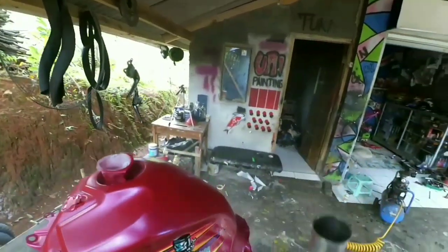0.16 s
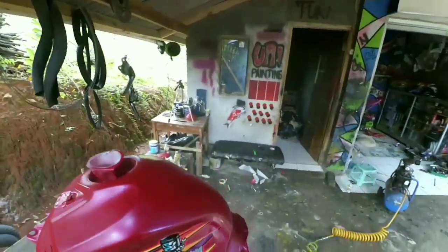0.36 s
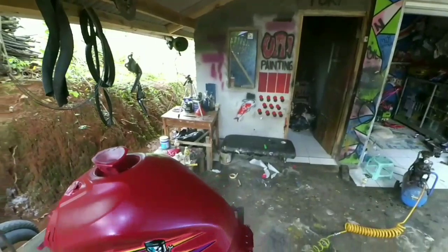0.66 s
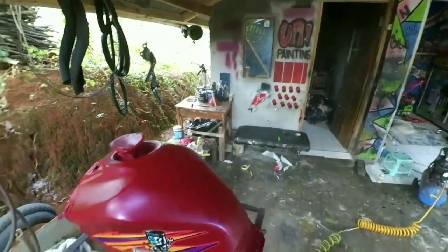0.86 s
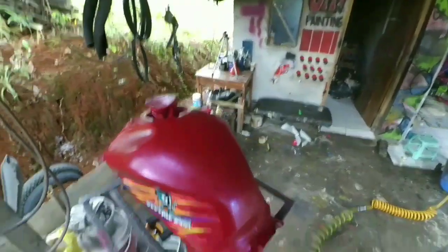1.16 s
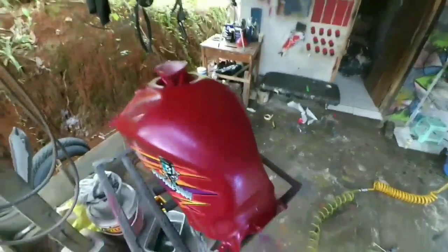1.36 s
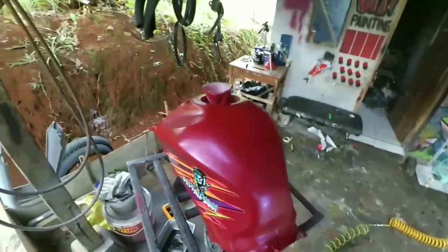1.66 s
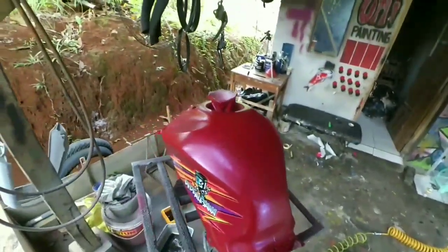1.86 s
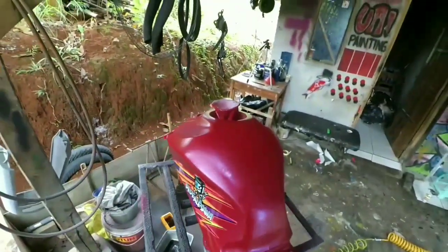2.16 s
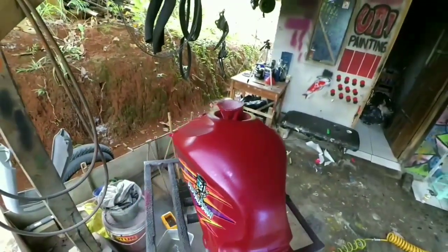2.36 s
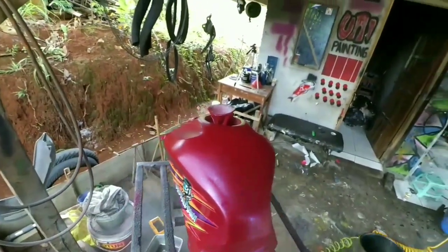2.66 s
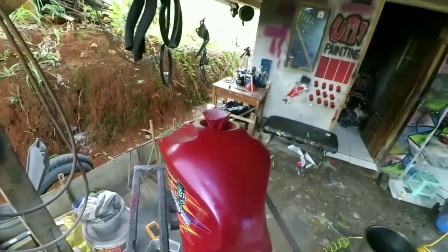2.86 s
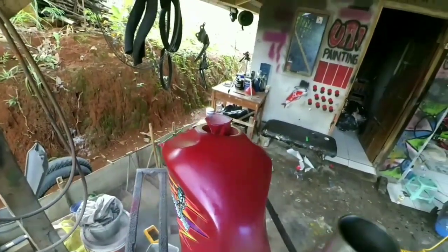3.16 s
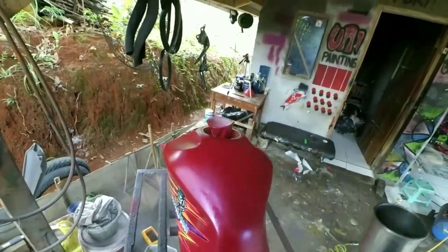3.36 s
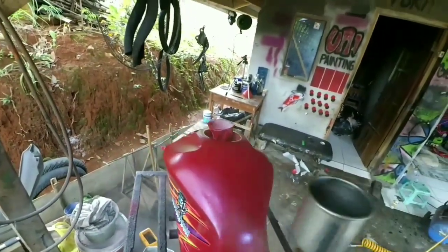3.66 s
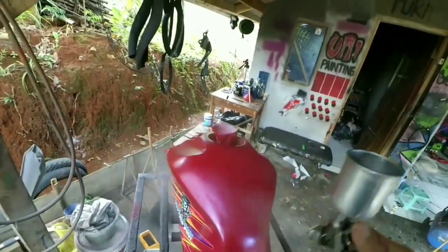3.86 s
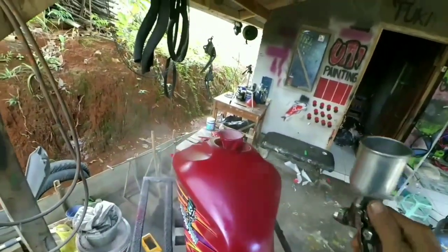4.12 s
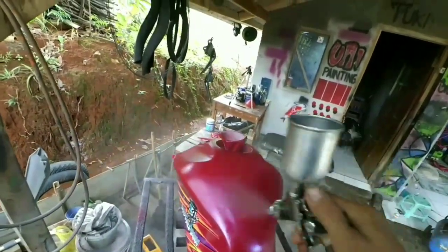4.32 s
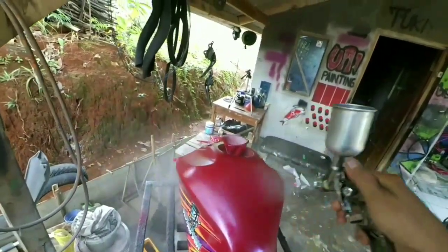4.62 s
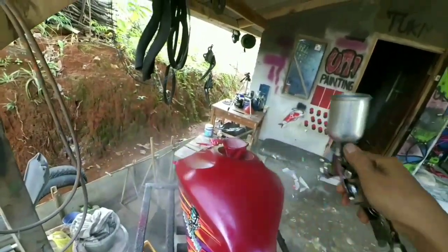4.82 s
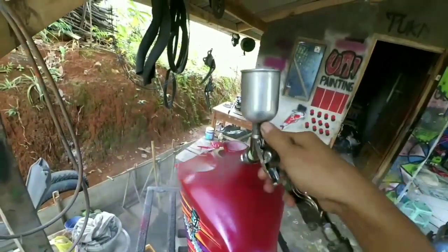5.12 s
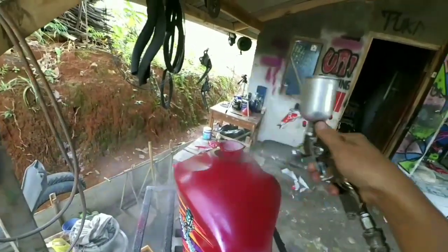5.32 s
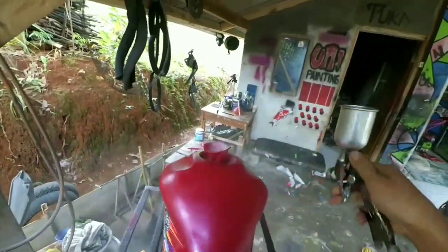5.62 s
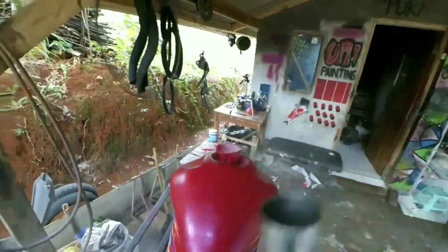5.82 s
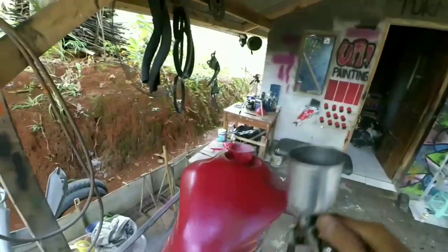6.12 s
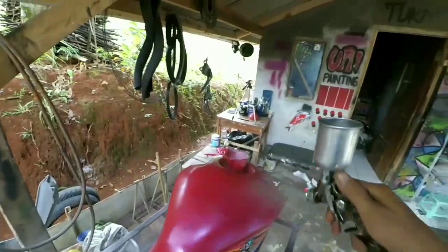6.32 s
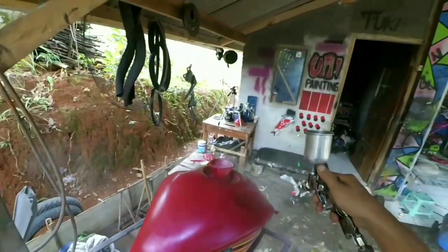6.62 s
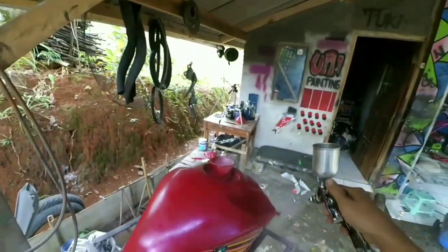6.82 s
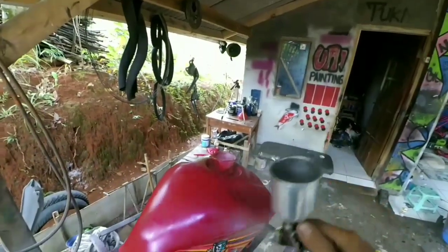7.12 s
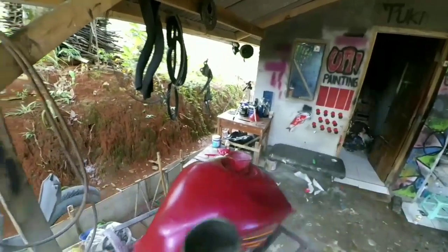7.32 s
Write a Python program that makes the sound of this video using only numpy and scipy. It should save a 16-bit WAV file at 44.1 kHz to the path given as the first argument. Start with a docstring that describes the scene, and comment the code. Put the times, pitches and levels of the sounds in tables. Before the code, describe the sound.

An open-sided workshop, heard close and in mono, with a low soft outdoor rumble and only a short faint reflection. A spray puff already under way ends at about 0.1 s; a very brief one follows at 0.2 s. Only quiet rumble remains until 2.05 s, when a short bright burst sounds, followed at 2.3 s by a long hissing pass. It starts with a sharp surge of air, then wavers gently, becoming fuller with paint mist from about 3.8 s. A soft dull bump occurs near 3.1 s. At 5.1 s a switch clacks with a metallic ring; a compressor motor whines upward and buzzes roughly until about 5.6 s, when the spray also stops. The piston settles into a steady droning chug with airy puffs and faint hiss. From 5.9 s a second long spray runs over it to the end, around 7.5 s.

```python
"""A spray gun mists paint on a motorcycle tank in an open-sided workshop, over a low outdoor rumble.
It gives three short test puffs of coloured noise, the first already under way, then a long first pass.
During that pass something bumps softly, then a compressor's switch clacks; its motor whines and buzzes
as it runs up, and its piston drones on as a sum of crank-rate multiples, with puffs and hiss of air.
A second long pass follows over the drone; the sound is mono."""
import sys
import numpy as np
from scipy import signal
from scipy.fft import rfft, irfft, next_fast_len
from scipy.io import wavfile
from scipy.ndimage import map_coordinates

SR = 44100
rng = np.random.default_rng(int(sys.argv[2]) if len(sys.argv) > 2 else 0)


def materialize(psi):
    """Save the field psi as 16-bit PCM at rate SR to the path in sys.argv[1].

    A 1-D psi becomes a single channel; in a 2-D psi each row is a channel.
    """
    bounded = np.clip(np.atleast_2d(psi).T, -1, 1)
    quanta = np.round(bounded * 32767).astype(np.int16)
    wavfile.write(sys.argv[1], SR, quanta)


N = 329868


def amp(db):
    """Decibels to gain."""
    return 10 ** (np.asarray(db) / 20)


def unit(x):
    """Scale to rms 1."""
    return x / np.sqrt(np.mean(x ** 2) + 1e-20)


def clock():
    """Time of each sample in seconds."""
    return np.arange(N) / SR


def wobble(rate):
    """A smooth random curve through `rate` random knots a second."""
    coarse = clock()[::64]
    knots = rng.standard_normal(int(N * rate / SR) + 4)
    return np.interp(clock(), coarse, map_coordinates(knots, [coarse * rate]))


def filtered(x, response):
    """x times a complex response of frequency, padded so that tails do not wrap round."""
    m = 2 * next_fast_len(N // 2 + SR // 4)
    return irfft(rfft(x, m) * response(np.fft.rfftfreq(m, 1 / SR)), m)[:N]


def colour(points):
    """Causal response through (Hz, dB) points on a log frequency axis."""
    f, db = np.transpose(points)

    def response(hz):
        log_gain = np.log(amp(np.interp(np.log(hz + 1), np.log(f + 1), db)))
        # folding the cepstrum forward in time gives minimum phase
        cepstrum = irfft(log_gain)
        cepstrum[1:len(hz) - 1] *= 2
        cepstrum[len(hz):] = 0
        return np.exp(rfft(cepstrum))
    return response


def resonances(modes):
    """Causal response of (Hz, width in Hz, dB) modes, added with alternating sign."""
    def response(f):
        total = 0
        for k, (centre, width, db) in enumerate(modes):
            damping = 1j * f * width
            total = total + (-1) ** k * amp(db) * damping / (centre * centre - f * f + damping)
        return total
    return response


def noise(response, gate=1):
    """Gated white noise through a response, rms 1."""
    return unit(filtered(gate * rng.standard_normal(N), response))


def decay(start, t60):
    """An envelope that jumps to 1 and falls 60 dB in t60 seconds."""
    age = clock() - start
    return (age >= 0) * amp(-60 * np.maximum(age, 0) / t60)


def fall(stop, t60):
    """An envelope that holds at 1 until stop, then falls 60 dB in t60 seconds."""
    return amp(-60 * np.maximum(clock() - stop, 0) / t60)


# Colour of the outdoor rumble. Each row: frequency in Hz, density in dB per Hz.
OUTDOOR_COLOUR = [(11, -6.5), (18, -3), (34, -1.5), (66, -10), (97, -12), (125, -22), (227, -26.5),
                  (309, -35), (346, -28), (471, -34), (781, -43), (1010, -67), (1100, -46.5), (1260, -44),
                  (15000, -71)]
# Distant drone and faint shrilling. Each row: centre in Hz, width in Hz, level in dB.
YARD_MODES = [(24.2, 3.2, 15.5), (108.4, 51, 1), (258.5, 78, -6), (522, 30, -12.5), (803, 131, -16),
              (4630, 560, -47), (7300, 260, -43.5)]


def background(rumble_db=-45, hum_db=-49):
    """Outdoor rumble, its level wavering slightly, with a faint far hum from resonated noise."""
    rumble = amp(rumble_db + 0.19 * wobble(4.02)) * noise(colour(OUTDOOR_COLOUR))
    return rumble + amp(hum_db) * noise(resonances(YARD_MODES))


# Trigger pulls. Each row: open in seconds, close in seconds, level in dB, air surge in dB.
TRIGGER_PULLS = [(-.1, 0.089, -4.5, 4), (0.197, 0.27, -2.5, -9), (2.062, 2.156, 1.5, 4.5),
                 (2.275, 5.583, 1.5, 4), (5.901, 7.601, 1, 3)]
# Colours of the air jet, the paint mist and the opening surge.
# Each row: frequency in Hz, density in dB per Hz.
JET_COLOUR = [(200, -23.5), (600, -16), (1200, -10.5), (2500, -9.5), (3700, -4.5), (5500, -4), (7200, 0),
              (8600, 0.5), (10000, -0.5), (11500, -4.5), (13500, -7), (15400, -10)]
MIST_COLOUR = [(200, -13.5), (600, -14), (1800, -12.5), (2600, -12.5), (3600, 0.5), (4600, 0), (5600, 0),
               (6600, 1.5), (8000, -4.5), (12000, -31)]
SURGE_COLOUR = [(400, -6.5), (1200, -7), (2500, -4), (4000, -3.5), (7500, -6), (10000, 5), (12000, 4.5),
                (14700, -2)]
# The hiss swells as the gun swings. Each row: time in seconds, hiss in dB.
# Only the swing relative to REFERENCE_HISS_DB is used, scaled for each layer.
FIRST_PASS_HISS = [(2.33, -42), (2.38, -42.5), (2.59, -40.5), (2.77, -43.5), (2.98, -41), (3.39, -40.5),
                   (3.42, -43.5), (3.69, -39), (4.13, -42.5), (4.21, -40), (4.65, -39.5), (4.81, -42.5),
                   (5.23, -40), (5.55, -41.5)]
SECOND_PASS_HISS = [(5.96, -41.5), (5.972, -42.5), (6.118, -38.5), (6.848, -42.5), (7.124, -40.5),
                    (7.46, -43)]
REFERENCE_HISS_DB = -39  # near the loudest swings
JET_SWING, MIST_SWING = 0.74, 1.3  # dB of each layer per dB of swing
APPROACH_S, REACHED_S = 3.7, 3.8  # the gun is brought up to the tank
OFF_TANK_DB = -4  # less mist strikes before that
PAINT_RISE_S = 0.14  # time constant of the paint following the air into each pull
# strongest band of the jet: lower when aimed squarely
FOCUS_HZ, FOCUS_HZ_PER_DB, FOCUS_OFF_TANK_HZ = 7710, -130, 348.7


def focus_band(swing_db, off_tank, width_hz=700):
    """The jet's strongest band is low-passed noise shifted up in pitch, sliding as the nozzle turns."""
    low_noise = noise(lambda hz: 1 / (1 + (hz / width_hz) ** 2) + 0j)
    focus_hz = FOCUS_HZ + FOCUS_HZ_PER_DB * swing_db + FOCUS_OFF_TANK_HZ * off_tank
    shift_turns = np.cumsum(focus_hz - width_hz / 2) / SR
    return unit(np.real(signal.hilbert(low_noise) * np.exp(2j * np.pi * shift_turns)))


def spray(closing_t60=0.15, surge_t60=0.55, jet_db=-38.5, focus_db=-51, mist_db=-44.0, surge_db=-43):
    """Air tears paint from the nozzle; hose pressure brightens each start, and aim colours the rest."""
    opening_s = .009
    t, valve, surge, paint = clock(), np.zeros(N), np.zeros(N), np.zeros(N)
    for opens, closes, db, extra_db in TRIGGER_PULLS:
        opened = np.clip((t - opens) / opening_s + .5, 0, 1) ** 2
        flow = opened * fall(closes, closing_t60)
        valve += amp(db) * flow
        surge += amp(extra_db) * flow * decay(opens, surge_t60)
        paint += amp(db) * flow * (1 - np.exp(-np.maximum(t - opens, 0) / PAINT_RISE_S))
    swing_s, hiss_db = np.transpose(np.vstack([FIRST_PASS_HISS, SECOND_PASS_HISS]))
    swing_db = np.interp(t, swing_s, hiss_db) - REFERENCE_HISS_DB
    off_tank = np.clip((REACHED_S - t) / (REACHED_S - APPROACH_S), 0, 1)

    jet = amp(jet_db) * noise(colour(JET_COLOUR)) + amp(focus_db) * focus_band(swing_db, off_tank)
    jet = amp(JET_SWING * swing_db) * jet
    mist_level = amp(mist_db + MIST_SWING * swing_db + OFF_TANK_DB * off_tank)
    mist = mist_level * noise(colour(MIST_COLOUR))
    return valve * jet + paint * mist + amp(surge_db) * surge * noise(colour(SURGE_COLOUR))


# Soft handling bump. Each row: time in seconds, level in dB.
SOFT_BUMPS = [(3.075, -50)]


def bump(t60=0.25):
    """Something bumps softly nearby: a dull burst of noise dies away."""
    dull = noise(colour([(80, -15), (200, -4), (600, 2), (900, -16), (3000, -40)]))
    return dull * sum(amp(db) * decay(s, t60) for s, db in SOFT_BUMPS)


# Switch clack and its bounce. Each row: time in seconds, level in dB.
SWITCH_CLACKS = [(5.101, -33.5), (5.121, -57)]
# Ringing of the compressor's case. Each row: centre in Hz, width in Hz, level in dB.
CASE_MODES = [(970, 80, 10), (1240, 110, -8), (1333, 42, 7.5), (3280, 91, 5), (3940, 120, -2),
              (4160, 180, -16), (4370, 160, 3.5), (4840, 37, -3), (5300, 74, 2)]


def clack(t60=0.2, ring_db=1, crack_db=-1):
    """The pressure switch snaps, a burst of broad noise, and jolts the case's resonances."""
    crack = noise(colour([(150, -7), (400, -13), (900, 4), (1400, 0.0), (2200, -5), (4500, -3),
                          (7000, -3), (14000, -18)]))
    snap = sum(amp(db) * decay(s, t60) for s, db in SWITCH_CLACKS)
    return snap * (amp(ring_db) * noise(resonances(CASE_MODES)) + amp(crack_db) * crack)


SWITCH_ON_S = 5.1  # the motor starts
# crank turns a second: first jerk, acceleration, full speed
KICK_HZ, SPIN_UP_HZ_PER_S, CRANK_HZ = 10, 90, 43.05


def crank():
    """The shaft gains speed evenly, then levels off: its share of full speed, and its turns so far."""
    knee, unevenness_turns = 12, .006
    age = clock() - SWITCH_ON_S
    ramp = (age > 0) * (KICK_HZ + SPIN_UP_HZ_PER_S * np.abs(age)) / CRANK_HZ
    speed = ramp / (1 + ramp ** knee) ** (1 / knee)
    turns = CRANK_HZ * np.cumsum(speed) / SR + unevenness_turns * wobble(24)
    return speed, turns


# The motor's whine. Each row: multiple of the crank rate, level in dB.
WHINE_ORDERS = [(16, -4), (35, -3)]
CUT_OUT_S = 5.555  # the motor's starting winding drops out
BUZZ_S, BUZZ_ATTACK_S, BUZZ_RELEASE_T60 = 5.225, .125, .1  # the housing buzzes until the cut-out


def run_up(speed, turns, housing_hz=972, whine_db=-47.5, buzz_db=-38, whine_rise_s=.08):
    """The starting motor whines roughly upwards, less near full speed, and its housing buzzes in beats."""
    beat_hz, bite = 52, .9
    beat_rough, buzz_rough, whine_rough = .4, .3, .7  # phase unevenness in radians
    t = clock()
    since = t - SWITCH_ON_S
    whine = sum(amp(db) * np.sin(2 * np.pi * k * turns + whine_rough * wobble(90))
                for k, db in WHINE_ORDERS)
    slip = np.clip(since / whine_rise_s, 0, 1) * (1 - speed) ** 2

    beats = np.exp(-bite * np.cos(2 * np.pi * beat_hz * since + beat_rough * wobble(30)))
    buzz = beats * np.sin(2 * np.pi * housing_hz * since + buzz_rough * wobble(45))
    strain = np.clip((t - BUZZ_S) / BUZZ_ATTACK_S, 0, 1) * fall(CUT_OUT_S, BUZZ_RELEASE_T60)
    return slip * amp(whine_db) * unit(whine) + strain * amp(buzz_db) * unit(buzz)


# Drone of the pump. Each row: multiple of the crank rate, level in dB at full speed.
PUMP_ORDERS = [(1, -9), (2, 4), (4, -13), (7, -10), (8, -2.5), (9, -11), (10, -10), (12, -11), (13, -8),
               (14, -6.5), (15, -9), (17, 1.5), (20, -1.5), (22, .5), (23, -11), (24, -2), (26, -12),
               (29, -11), (30, -12), (31, -13), (32, -14), (34, -16), (35, -15)]
DRONE_DB, DRONE_FADE_DB_PER_S = -34.5, 0.63  # the pump's level at switch-on and its easing
SPEED_POWER = 1.57  # the drone's growth with speed


def piston_drone(speed, turns):
    """Multiples of the crank rate climb through the case's fixed resonances; higher ones tremble more."""
    phase_spread, rough = .11, .09  # radians
    running = speed > 0
    orders, order_db = np.transpose(PUMP_ORDERS)
    drone = 0
    for k in orders:
        phase = 2 * np.pi * k * turns - phase_spread * k * k + rough * np.sqrt(k) * wobble(45)
        drone = drone + amp(np.interp(k * speed, orders, order_db)) * np.cos(phase)
    # rms 1 while running
    drone = unit(drone * running) * np.sqrt(running.mean())
    return speed ** SPEED_POWER * drone


# Colours of the intake puffs and of air hissing through the pipework.
# Each row: frequency in Hz, density in dB per Hz.
CHUFF_COLOUR = [(50, 9), (90, 8), (200, -6), (335, 6.5), (450, -2), (600, 1.5), (800, 0.5), (980, 4.5),
                (1180, -6.5), (1280, -1), (1500, -5.5), (1700, -9), (3000, -24.5)]
PIPE_COLOUR = [(600, -36), (1400, -23), (1800, -1.5), (2800, -4.5), (3500, -1), (4400, -7), (7000, -11),
               (9200, -6), (11500, -3), (14000, -35)]
# Whistling of the valves. Each row: centre in Hz, width in Hz, level in dB.
VALVE_MODES = [(2285, 50, -3), (2550, 70, -7), (3400, 200, -9), (3785, 60, -1), (9000, 300, -10),
               (10290, 170, 0), (10770, 130, 2.5)]


def pump_air(turns, chuff_db=-6.2, pipe_db=-11, valve_db=-12, start_s=5.17, rise_s=.23):
    """Air builds up as two noise puffs a turn and a steady hiss in the pipe and valves."""
    bite = .7
    puffs = np.exp(bite * np.sin(2 * 2 * np.pi * turns))
    air = amp(chuff_db) * noise(colour(CHUFF_COLOUR), puffs)
    air += amp(pipe_db) * noise(colour(PIPE_COLOUR))
    air += amp(valve_db) * noise(resonances(VALVE_MODES))
    return np.clip((clock() - start_s) / rise_s, 0, 1) * air


def pump(speed, turns, drone_db=-3):
    """The piston's drone grows with speed and its air joins in; both ease off slowly together."""
    level = amp(DRONE_DB - DRONE_FADE_DB_PER_S * (clock() - SWITCH_ON_S))
    return level * (amp(drone_db) * piston_drone(speed, turns) + pump_air(turns))


def compressor():
    """Motor and pump share one shaft."""
    speed, turns = crank()
    return run_up(speed, turns) + pump(speed, turns)


def workshop(x, t60=0.24, wet_db=-14):
    """A short, weak answer from the roof and the wall: a decaying noise tail."""
    t = np.arange(SR // 2) / SR
    tail = rng.standard_normal(len(t)) * amp(-60 * t / t60) * (t > .005)
    return x + amp(wet_db) * signal.fftconvolve(x, tail / np.linalg.norm(tail))[:N]


def scene():
    """All sources, alike in both channels; only spray, bump and clack get the workshop's answer."""
    mono = background() + workshop(spray() + bump() + clack()) + compressor()
    return np.array([mono, mono])


def record(dry):
    """The treble is cut off steeply around the band limit."""
    top_hz, slope_hz = 15500, 300
    band = lambda hz: np.clip((top_hz - hz) / slope_hz + .5, 0, 1) ** 2
    return np.array([filtered(channel, band) for channel in dry])


dry = scene()
out = record(dry)
materialize(out)
```